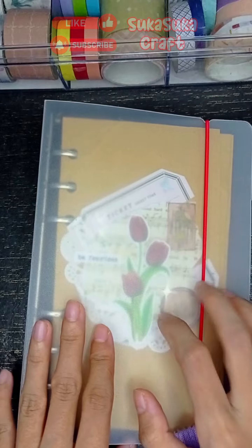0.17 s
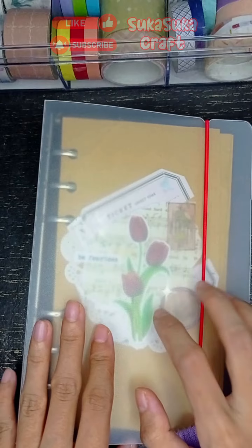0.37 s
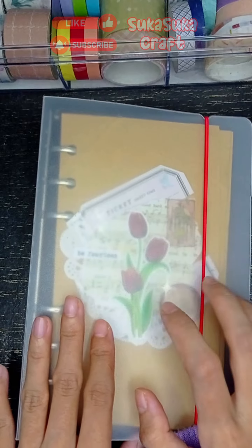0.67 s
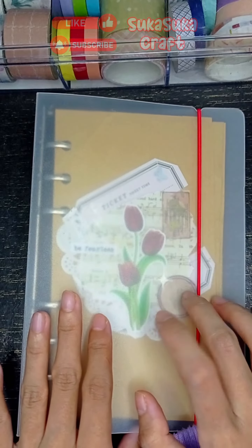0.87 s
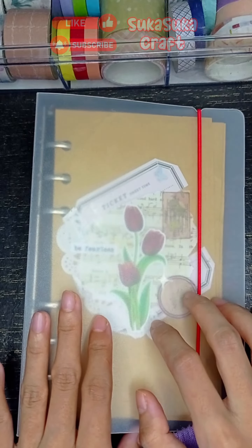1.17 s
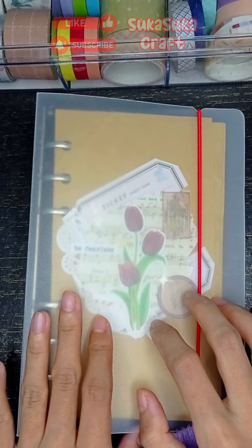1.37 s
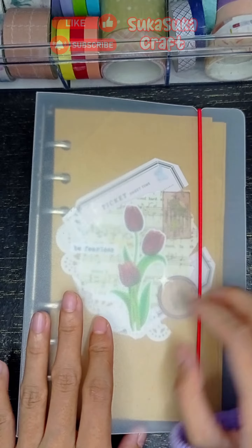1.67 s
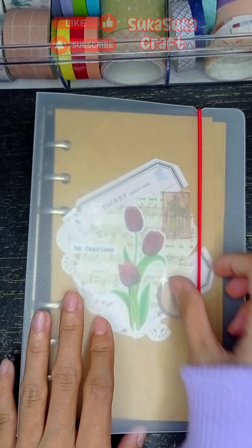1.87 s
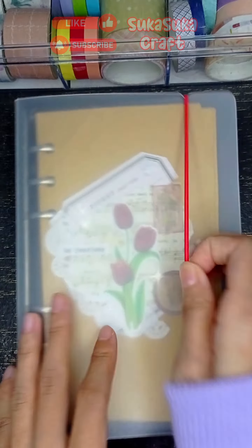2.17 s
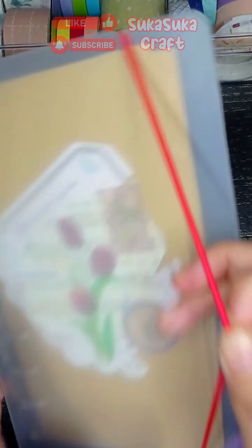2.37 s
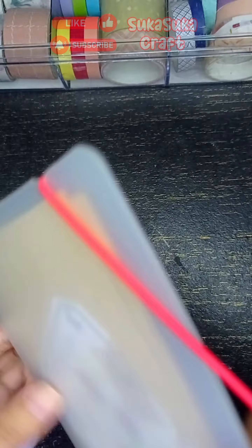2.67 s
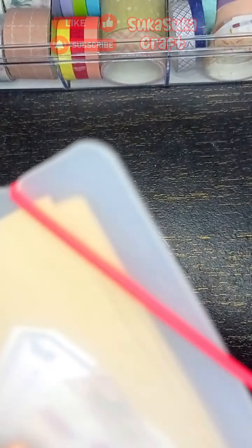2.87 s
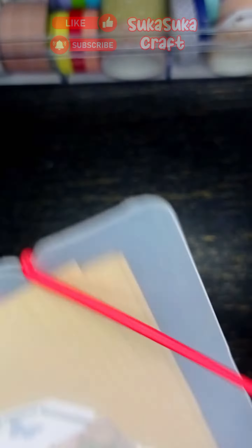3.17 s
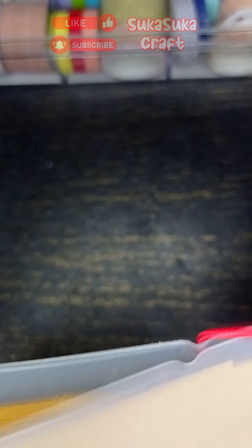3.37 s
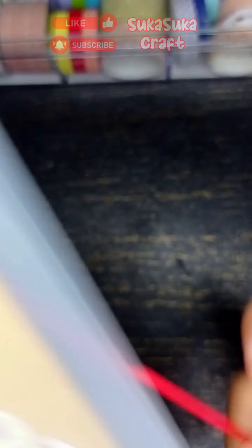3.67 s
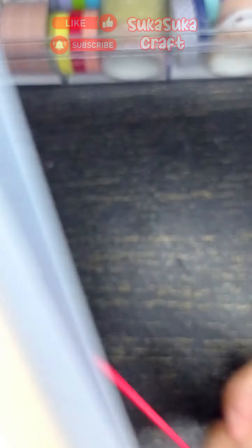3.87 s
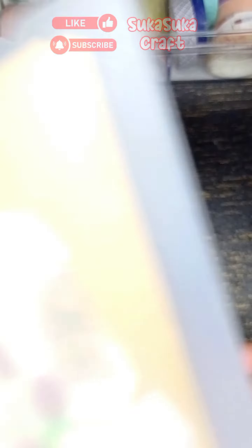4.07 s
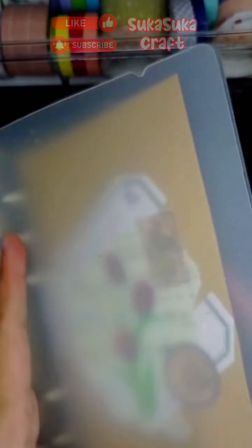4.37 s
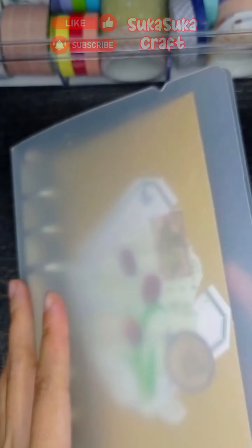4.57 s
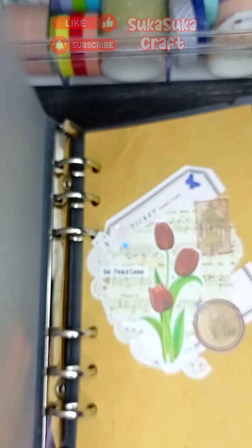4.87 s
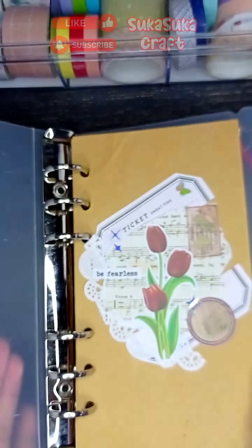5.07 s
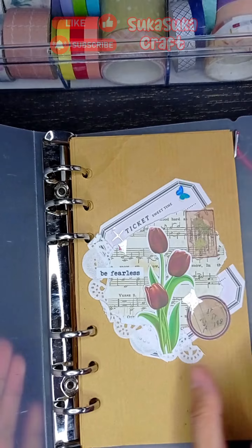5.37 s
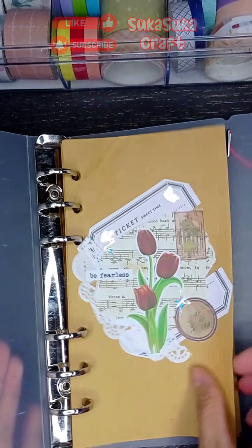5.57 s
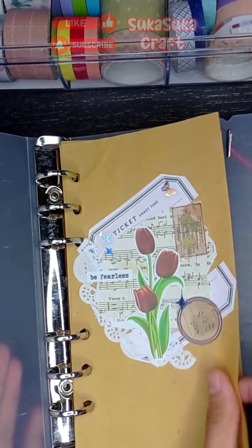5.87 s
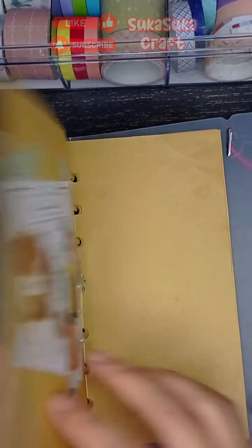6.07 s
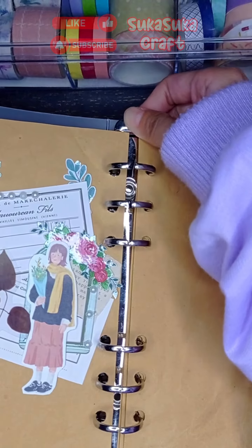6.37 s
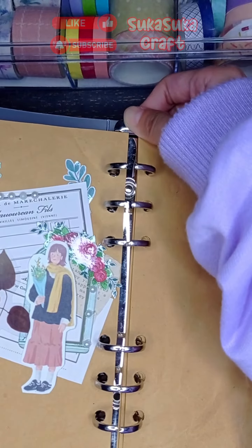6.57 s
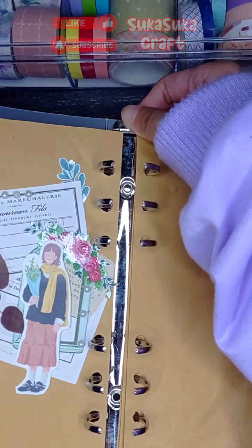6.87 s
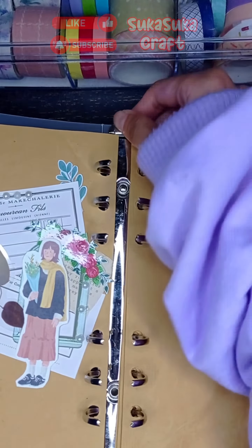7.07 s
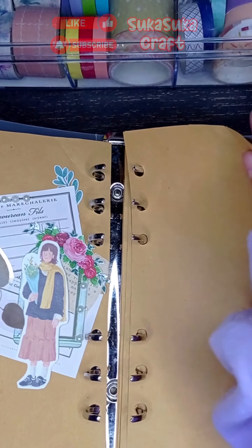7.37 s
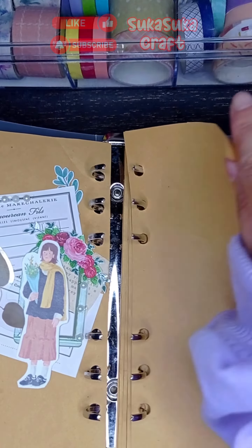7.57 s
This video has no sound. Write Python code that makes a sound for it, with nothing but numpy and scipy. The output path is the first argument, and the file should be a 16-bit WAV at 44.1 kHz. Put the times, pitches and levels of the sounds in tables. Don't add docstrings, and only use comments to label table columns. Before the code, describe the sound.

Close up in a small, quiet room, fingernails tap a hollow plastic binder cover in spaced, loud, woody clacks. After a brief near-silence an elastic band is pulled off with rubs and knocks, the binder is turned and bumped on the desk, and its cover opens with a thump. Stiff card pages rustle softly, then the metal rings snap apart with a short, fading metallic buzz.

```python
import sys
import numpy as np
from scipy import signal
from scipy.fft import rfft, irfft
from scipy.io import wavfile
from scipy.ndimage import uniform_filter1d

SR = 44100
rng = np.random.default_rng(int(sys.argv[2]) if len(sys.argv) > 2 else 0)


def field_ratio(decibels):
    return 10 ** (np.asarray(decibels, dtype=float) / 20)


def bounce(signal):
    frames = np.transpose(np.atleast_2d(signal))
    limited = np.clip(frames, -1, 1)
    pcm = np.round(limited * 32767).astype(np.int16)
    wavfile.write(sys.argv[1], SR, pcm)


N = 340011

# start in seconds, cover ring peak in dB, brightness in dB, cover pitch in Hz.
NAIL_TAPS = [(.268, -33, -9.5, 1190), (.277, 0.5, -6.5, 854), (.4476, 0, -6, 864), (.649, -1, -4, 894),
             (.749, -45.5, 9, 972), (1.007, -9.5, -0.5, 907), (1.025, -30, 9, 940), (1.085, -4, -1, 844),
             (1.225, -1, -6.5, 841), (6.81, -4.5, 12, 1183), (6.814, -10.5, 4.5, 900), (7.077, -40, 4, 820),
             (7.222, -37.5, 23.5, 1170), (7.458, -39.5, 11, 1026), (1.317, -35, -22, 900)]
# start in seconds, cover ring peak in dB, brightness in dB, cover pitch in Hz.
HANDLING_KNOCKS = [(1.859, -32, 4, 824), (1.995, -23, -13.5, 1080), (2.02, -13.5, -7, 850),
                   (2.539, -22, -13, 834), (2.689, -10.5, -7.5, 773), (3.027, -27, 0, 840),
                   (3.086, -8, 9, 847), (3.468, -35, 22.5, 805), (3.506, -3, -17.5, 890),
                   (3.601, -28, -1.5, 1180), (3.699, -43.5, 22.5, 1310), (3.751, -29.5, 9, 1190),
                   (3.901, -6.5, -4.5, 894), (4.134, -22, -18, 986), (4.266, -39.5, 10.5, 750),
                   (4.331, -15.5, -9, 1120), (4.37, -17.5, 8.5, 920), (4.413, -29.5, 0, 1293),
                   (4.515, -27, -2, 1120), (4.655, -37, 14, 1060), (4.73, -53, 20, 880),
                   (5.009, -40.5, 11.5, 840), (5.022, -48.5, 17, 744), (5.106, -31, 0.5, 850),
                   (5.146, -26, 2, 1070), (5.318, -15.5, 7, 945), (5.419, -14.5, 4, 1173),
                   (6.165, -49.5, 13, 990), (2.831, -13.5, -16, 750), (3.226, -38, -3.5, 1000)]
# start in seconds, cover ring peak in dB, brightness in dB, cover pitch in Hz, contact in ms.
BAND_RIPS = [(.048, -34, -6, 858, 37), (1.81, -20.5, -6.5, 1067, 18), (2.076, -8.5, -4, 908, 6.6),
             (2.219, -21.5, -40, 1100, 10), (2.269, -14.5, -23, 1000, 14), (2.324, -20, -10, 826, 16),
             (2.354, -25.5, 1.5, 846, 14), (2.531, -16, -47, 950, 13), (2.715, -10, -13, 1210, 5),
             (2.781, -11.5, 10, 1097, 10), (2.814, -11.5, 15.5, 818, 11), (3.303, -32, -9.5, 926, 14),
             (3.379, -44, 13.5, 833, 3.5), (3.529, -8, 0.5, 790, 11), (3.589, -15.5, 3.5, 1150, 16),
             (3.8, -23.5, 0.5, 914, 8.3), (3.872, -16, -10, 867, 10), (3.892, -5.5, -6, 872, 13),
             (4.083, -34.5, -25, 1030, 20), (4.313, -31, -10, 900, 15), (4.344, -31, 11.5, 1020, 18),
             (4.529, -29.5, -17, 1130, 10), (4.797, -17.5, -6, 886, 10), (4.82, -34, 22.5, 865, 15)]
# start in seconds, cover ring peak in dB,
# sheet slap in dB re ring, sheet crackle in dB re ring, contact in ms.
CARD_RIPS = [(5.045, -46.5, 5, 29, 5), (5.211, -32.5, 8.5, 10, 8), (5.258, -32, 7, 9.5, 9.9),
             (5.284, -20.5, 3.5, -1.5, 15), (5.42, -19, 7.5, -3, 20), (5.517, -23, 15.5, 6.5, 24),
             (5.621, -25, -0.5, 8, 16), (5.707, -17.5, 1.5, 11.5, 9.3), (5.834, -44, 14, 27, 37),
             (5.947, -39, 3, 15.5, 22), (6.124, -33.5, 10, 13, 11), (7.502, -38, 19.5, 15.5, 10),
             (7.529, -34, -14, 2.5, 28), (7.558, -36, -3, 3.5, 25)]
# start in seconds, cover ring peak in dB,
# sheet slap in dB re ring, sheet crackle in dB re ring, contact in ms.
LONG_DRAGS = [
    (.834, -31.5, -20, -16.5, 79),
    (2.039, -11.5, -8, -17, 48.7),
    (2.245, -23, -2.5, -4, 54),
    (2.301, -17.5, -7, -8, 50),
    (2.942, -41, 0, 25, 52),
    (5.912, -52, 17.5, 29, 62),
    (6.06, -29, 8, 11, 92),
    (7.101, -33.5, 15, 20, 76.2),
]
# start in seconds, peak in dB, push in ms, flat slap in dB re desk.
DESK_THUMPS = [(0.052, -31, 6.1, 1), (0.289, -14.5, 3.2, 1), (0.463, -18.5, 4.5, -9),
               (0.666, -29, 1.5, -21.5), (0.838, -25.5, 4.7, -8), (1.023, -18.5, 6.3, -14),
               (1.098, -23.5, 2, -5), (1.238, -24.5, 0.82, -12.5), (2.029, -23.5, 3.1, -17),
               (2.344, -5, 0.42, 9), (2.496, -32.5, 1.1, -10.5), (2.534, -20.5, 6, -18.5),
               (2.671, -16.5, 3.4, -11), (3.082, -27.5, 1.2, -19.5), (3.505, -32, 1.3, -4.5),
               (3.893, -25, 0.76, 11.5), (4.814, 0.5, 0.31, 8), (5.148, -29, 3.5, -20.5),
               (5.711, -21, 1.8, -13), (6.811, -23.5, 1, -10), (4.869, -21.5, 1.4, 14),
               (4.933, -25, 3.2, 7.5), (2.389, -25, 1.5, 21), (3.529, -33, 0.86, 20)]
# middle in seconds, half length in seconds,
# pressure on the cover in dB, slide of the sheets in dB.
HAND_STROKES = [(.42, 0.27, -67, -62), (0.871, 0.046, -37, -51), (1.12, 0.056, -62, -66),
                (1.273, 0.042, -50.5, -63), (1.779, 0.042, -54, -56.5), (1.902, 0.067, -54.5, -42),
                (2.155, 0.17, -51.5, -56), (2.345, 0.12, -60, -62.5), (2.6, 0.19, -61, -60),
                (2.765, 0.092, -41.5, -46), (2.87, 0.063, -52, -37), (3.0, .06, -54.5, -41),
                (3.135, 0.048, -47, -40.5), (3.438, 0.11, -47.5, -54.5), (3.622, 0.073, -39, -41.5),
                (3.77, 0.12, -49, -56), (3.87, 0.069, -36, -35.5), (4.097, 0.12, -57.5, -50),
                (4.412, 0.12, -52.5, -48), (4.863, 0.063, -54.5, -46), (5.11, 0.12, -48.5, -44.5),
                (5.259, 0.051, -39, -36), (5.553, 0.093, -38.5, -38.5), (5.69, 0.051, -76, -38),
                (5.81, 0.17, -62, -45), (6.194, 0.046, -63, -60), (6.907, 0.057, -50.5, -38.5),
                (7.211, 0.057, -50, -35), (7.5, 0.14, -65, -54), (7.7, 0.063, -63, -50.5)]
# time in seconds, level in dB.
DESK_LEAN = [(0, -88), (.3, -54), (.5, -56.5), (.89, -46), (1.099, -61), (1.55, -68.5), (1.8, -55.5),
             (2.2, -58), (2.55, -45), (2.801, -63.5), (3.5, -62.5), (3.9, -57.5), (4.55, -61), (4.9, -49.5),
             (5.3, -42), (5.5, -52), (6.3, -66), (7.71, -53)]
# pitch ratio, level in dB, T60 in seconds.
COVER_MODES = [(1., 17, 0.028), (1.2, 10, 0.03), (0.8, 3, 0.025), (1.45, 6, .025)]
# frequency in Hz, level in dB, T60 in seconds.
DESK_MODES = [(119, -1, .12), (175.3, 9, .22), (206.9, 11, 0.14), (285.3, 2.5, 0.14), (320, -9.5, 0.0097),
              (513, -22.5, 0.012)]
# frequency in
# Hz, density in dB per Hz.
SHEET_COLOUR = [(700, -18.5), (1300, 2), (1800, 2), (2700, 3), (3300, 7), (4500, 3), (5700, 1), (6300, 2.5),
                (7300, -3.5), (8300, -11), (11800, -24), (13800, -32), (15000, -18.5), (15800, -22.5),
                (16300, -47.5)]
# frequency in Hz, density in dB per Hz.
SPINE_COLOUR = [(500, -11), (1000, 5), (3500, 0.5), (6500, 1.5), (8000, -7), (12000, -27), (15200, -9.5),
                (16300, -42)]
# frequency in Hz, level in dB.
WALL_COLOUR = [(400, -7.5), (900, 0.5), (3000, -8.5), (7000, -9.5), (16000, -4.5)]
# delay in ms, level in dB.
EARLY_ECHOES = [(4.2, -18), (13.5, -9), (17, -12), (27, -18)]
# frequency in Hz, density in dB per Hz.
RUMBLE_COLOUR = [(18, -60.5), (30, -15), (91, 16), (165, -4), (188, -10), (225, -8), (252, -10),
                 (327, -29.5), (874, -22.5), (1500, -44), (1950, -56.5), (3300, -120)]
# frequency in Hz, density in dB per Hz.
HISS_COLOUR = [(1000, 1.5), (5900, -20), (6900, 2), (7700, -23), (13500, -27), (15000, -18), (15800, -18),
               (16500, -38)]
# time in seconds, gain in dB.
NOISE_GATE = [
    (0, -34),
    (.04, -20),
    (.08, 15),
    (.22, -4.5),
    (.3, 5),
    (1.5, 2.5),
    (6.15, 10.5),
    (6.3, -6.5),
    (6.42, -1.5),
    (7.71, 5.5),
]


def blows(rows, slap_db, ms=None):
    slap_per_bright = 0.44
    return [(s, db, slap_db + slap_per_bright * bright, bright, ms or own_ms[0], hz)
            for s, db, bright, hz, *own_ms in rows]


def contacts(rows, rise, lead, edge, strike, spread_db):
    size = 8192
    split_hz, bend_db, bend_t60_s = 3500, -34, .016
    rattle_db, rattle_s = -28.5, 0.018
    out = np.zeros(N + 2 * size)
    t = np.arange(size) / SR
    sheet = colour(SHEET_COLOUR)
    chances = rng.standard_normal((len(rows), 3, size))
    for (s, db, slap_db, crackle_db, ms, hz), chance in zip(rows, chances):
        u = t / (max(ms, .1) / 1000)
        swell = 1 - np.exp(-((u + 0.081) / rise) ** 2)
        force = unit(slips(chance[:2] * [[1], [100]], spread_db) * swell * np.exp(-u ** edge))
        force[0] -= strike

        draws = chance[2, :40].reshape(20, 2)
        bend_modes = [(12 ** (c * 50 % 1), bend_db + 4 * g, bend_t60_s) for c, g in draws]
        bend = ring(bend_modes, 1400, 2048)
        bend[0] = 1

        rattle = strike * field_ratio(rattle_db) * chance[0, ::-1] * np.exp(-t / rattle_s)
        crisp = signal.fftconvolve(force + rattle, signal.fftconvolve(sheet, bend))
        cover = signal.fftconvolve(force, ring(COVER_MODES, hz, 4096))
        slap = band(crisp, 1993, split_hz)
        crackle = band(crisp, split_hz, 21000)
        first = int((s - lead * ms / 1000) * SR)
        for part, rel_db in ((cover, 0), (slap, slap_db), (crackle, crackle_db)):
            out[first:][:size] += field_ratio(db + rel_db) * unit(part[:size])
    return out[:N]


def shiver():
    snap_s, snap_db, t60_s = 6.815, -28, .5
    t = np.arange(N) / SR - snap_s
    buzz = coloured_noise(SPINE_COLOUR)
    return (t > 0) * field_ratio(snap_db - 60 * np.abs(t) / t60_s + 0.9 * walk(90)) * buzz


def thumps():
    slap_hz, slap_t60_s = 262, 0.1
    size = 16384
    out = np.zeros(N + size)
    for s, db, ms, slap_db in DESK_THUMPS:
        push = -np.hanning(max(int(ms * SR / 1000), 8))
        body = ring([*DESK_MODES, (slap_hz, slap_db + 6, slap_t60_s)], 0.99, size)
        thump = band(np.convolve(body, push)[:size], 180, 2000)
        out[int(s * SR):][:size] += field_ratio(db) * unit(thump)
    return out[:N]


def strokes():
    rest_db = -79
    t = np.arange(0, N, 64) / SR
    s, half, *levels = np.transpose(HAND_STROKES)[:, :, None]
    bell = np.exp(-2 * ((t - s) / half) ** 2)
    curves_db = []
    for db in levels:
        power = np.sum(field_ratio(2 * db) * bell, axis=0) + field_ratio(2 * rest_db)
        curves_db.append(np.interp(np.arange(N) / SR, t, 10 * np.log10(power)))
    return curves_db


def handling(spread_db, flicker_db, patchy_db):
    desk_spread_db, rustle_top_hz = 1., 8800
    shared = walk(35)
    cover = grains(ring(COVER_MODES, 880, 4096), spread_db)
    sheet = grains(colour(SHEET_COLOUR), spread_db)
    desk = grains(ring(DESK_MODES, 0.92, 9800), desk_spread_db)
    patches_hz = 1000 * 1.35 ** np.arange(10)
    sheet = sum(band(sheet, hz, 1.35 * hz) * field_ratio(patchy_db * walk(50)) for hz in patches_hz)
    sheet = band(sheet, 630, rustle_top_hz)
    out = 0
    for db, x in zip(strokes() + curves(DESK_LEAN), (cover, sheet, desk)):
        out = out + field_ratio(db + flicker_db * (shared + 0.07 * walk(20))) * level(x)
    return out


def room(x):
    tail_db, t60_s, top_t60_s = -14.5, 0.24, 0.17
    t = np.arange(SR // 2) / SR
    noise = level(rng.standard_normal((2, len(t))))
    top = signal.sosfilt(signal.butter(2, 6000, "high", fs=SR, output="sos"), noise[0])
    tail = (noise[0] - top) * field_ratio(-60 * t / t60_s) + top * field_ratio(-60 * t / top_t60_s)
    tail = tail * np.clip(t / 0.004, 0, 1)
    tail = field_ratio(tail_db) * tail / np.sqrt(np.sum(tail ** 2))
    for ms, db in EARLY_ECHOES:
        late = t - ms / 1000
        tail = tail + field_ratio(db - 17) * noise[1] * (late > 0) * np.exp(-np.abs(late) / .0015)
    lumps = uniform_filter1d(np.abs(rfft(tail)), size=80)
    tail = irfft(rfft(tail) * np.mean(lumps) / lumps, len(t)) * (t < .4)
    return signal.fftconvolve(x, signal.fftconvolve(tail, colour(WALL_COLOUR)))[:N]


def room_tone():
    rumble_db, hiss_db, hiss_flicker_db = -61.5, -68.5, 3
    gate, = curves(NOISE_GATE)
    rumble = field_ratio(gate + rumble_db + 0.76 * walk(4)) * coloured_noise(RUMBLE_COLOUR)
    flicker = hiss_flicker_db * walk(9)
    hiss = field_ratio(gate + hiss_db + flicker + 0.76 * walk(4)) * coloured_noise(HISS_COLOUR)
    return rumble + hiss


def slips(chance, spread_db):
    return chance[0] * field_ratio(spread_db * -np.log(1 - chance[1] % 1))


def grains(body, spread_db):
    return signal.fftconvolve(slips(rng.standard_normal((2, N)) * [[1], [100]], spread_db), body)[:N]


def ring(modes, base_hz, size):
    t = np.arange(size) / SR
    return sum(field_ratio(db) * np.sin(2 * np.pi * base_hz * f * t) * 1000. ** (-t / t60) for f, db, t60 in modes)


def colour(points, size=4096):
    hz, db = np.transpose(points)
    bins_hz = np.arange(size // 2 + 1) * SR / size
    log_gain = np.interp(np.log(bins_hz + 1), np.log(hz), db) * np.log(10) / 20
    c = irfft(log_gain)
    c[1:size // 2] *= 2
    c[size // 2 + 1:] = 0
    return irfft(np.exp(rfft(c)))[:size // 2]


def coloured_noise(points):
    return level(signal.fftconvolve(rng.standard_normal(N), colour(points))[:N])


def band(x, lo_hz, hi_hz):
    return signal.sosfilt(signal.butter(2, [lo_hz, hi_hz], "band", fs=SR, output="sos"), x)


def walk(rate):
    k = int(SR / rate)
    held = np.repeat(rng.standard_normal(N // k + 2), k)
    return uniform_filter1d(uniform_filter1d(held, k), k)[:N]


def curves(table):
    s, *columns = np.vstack(table).T
    return [np.interp(np.arange(N) / SR, s, c) for c in columns]


def unit(x):
    return x / np.max(np.abs(x))


def level(x):
    return x / np.sqrt(np.mean(x ** 2))


def scene():
    open_hz, drag_hz = 1000, 900
    nails = blows(NAIL_TAPS, slap_db=-8, ms=1.1)
    knocks = blows(HANDLING_KNOCKS, slap_db=-0.5, ms=2.4)
    rips = blows(BAND_RIPS, slap_db=-2.5) + [(*row, open_hz) for row in CARD_RIPS]
    drags = [(*row, drag_hz) for row in LONG_DRAGS]
    hits = contacts(nails, rise=.05, lead=-.3, edge=1.5, strike=5., spread_db=2.)
    hits = hits + contacts(knocks, rise=.05, lead=-.3, edge=1.5, strike=2., spread_db=2.)
    hits = hits + contacts(rips, rise=.7, lead=.35, edge=2.5, strike=0, spread_db=3.)
    hits = hits + contacts(drags, rise=.16, lead=.06, edge=4, strike=0, spread_db=2.3)

    change_s = 6.137
    before = np.arange(N) < change_s * SR
    early = hits * before
    late = hits * (np.arange(N) > (change_s + .02) * SR)
    hands = handling(spread_db=3., flicker_db=5.5, patchy_db=2.5)
    heard = (early + room(early)) * before + late + room(late)
    return (heard + shiver() + thumps() + hands + room_tone())[None]


def band_limit(x):
    return signal.sosfilt(signal.butter(12, 16650, fs=SR, output="sos"), x)


def record(dry):
    mic_low_hz = 73
    thin = signal.sosfilt(signal.butter(3, mic_low_hz, "high", fs=SR, output="sos"), dry)
    mix = np.clip(thin, -1, 1)
    return band_limit(mix)


dry = scene()
out = record(dry)
bounce(out)
```